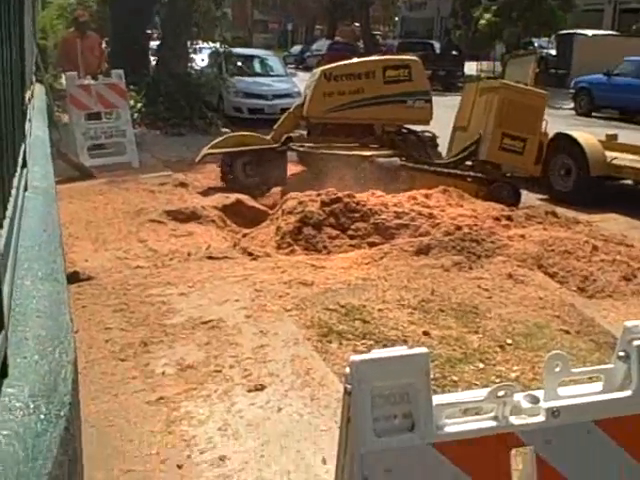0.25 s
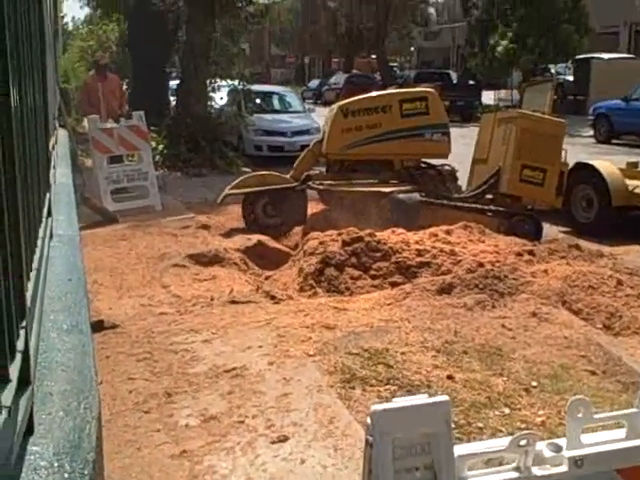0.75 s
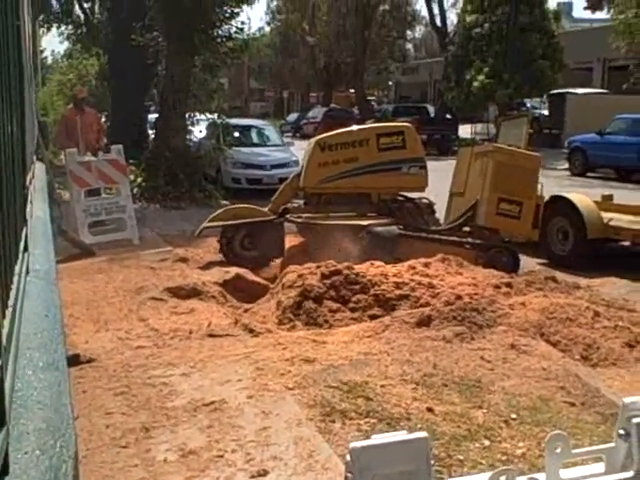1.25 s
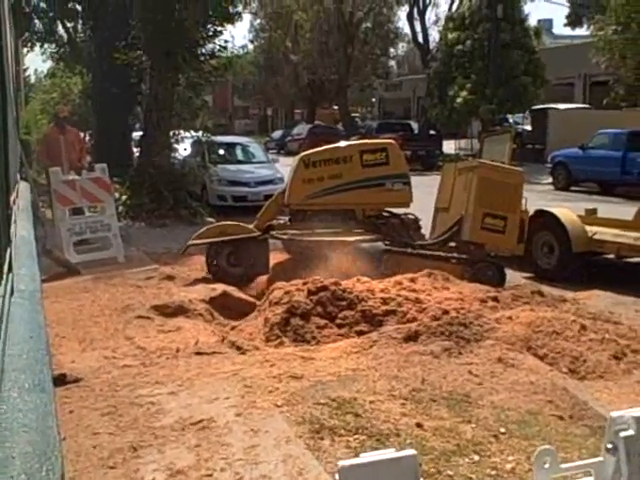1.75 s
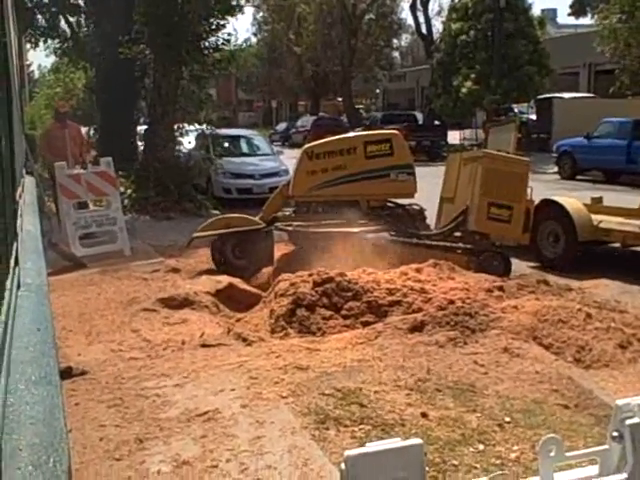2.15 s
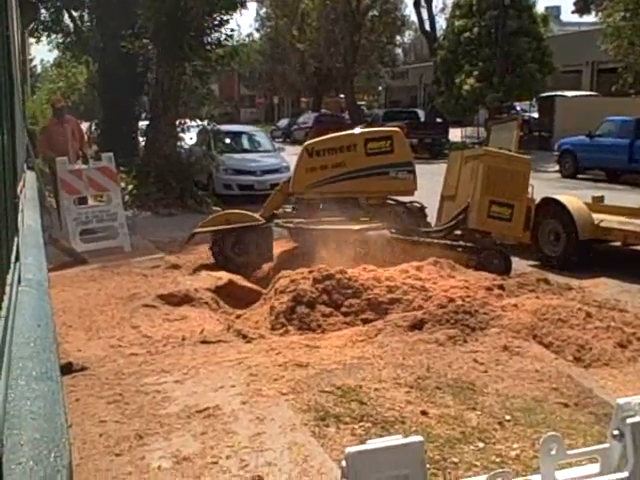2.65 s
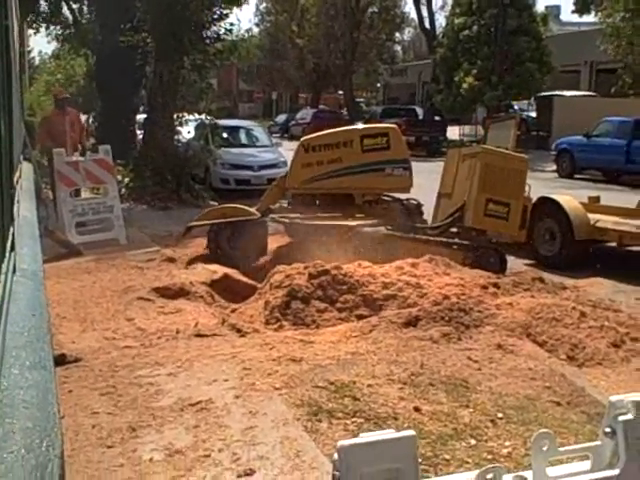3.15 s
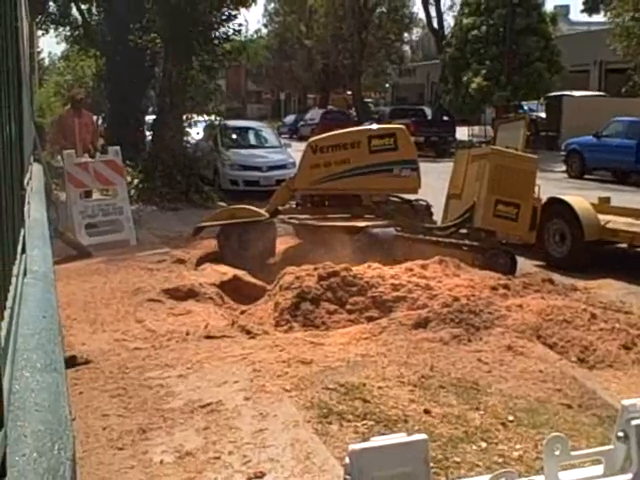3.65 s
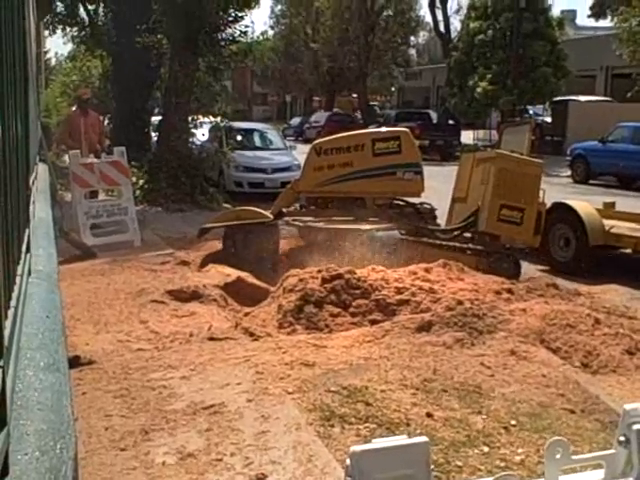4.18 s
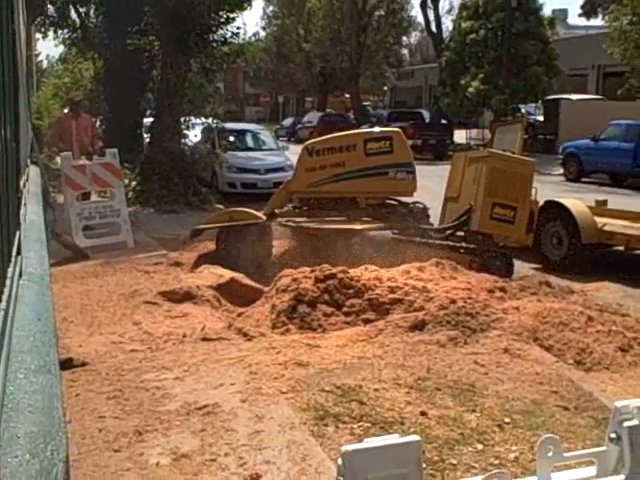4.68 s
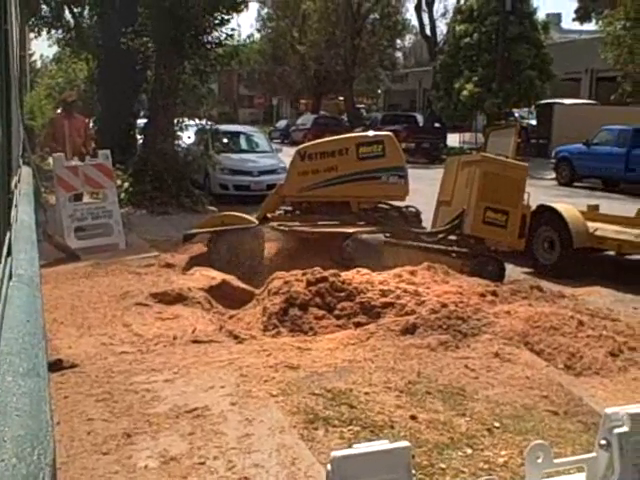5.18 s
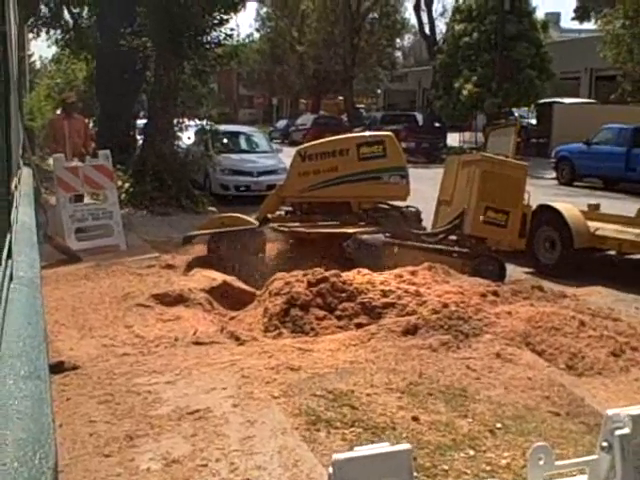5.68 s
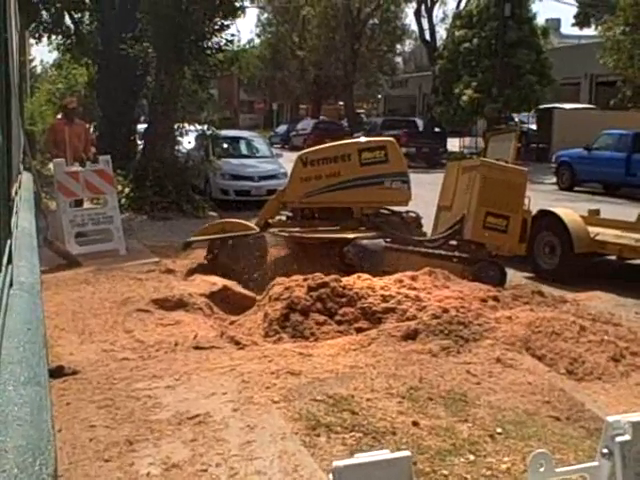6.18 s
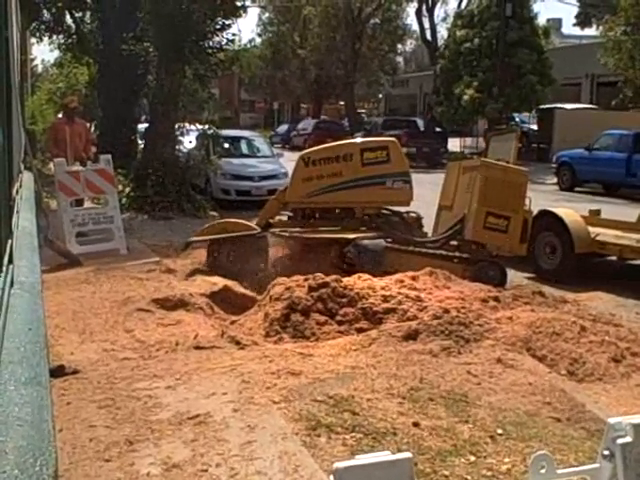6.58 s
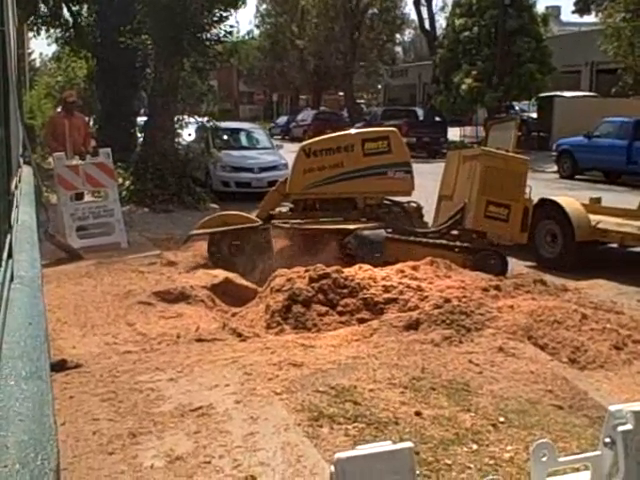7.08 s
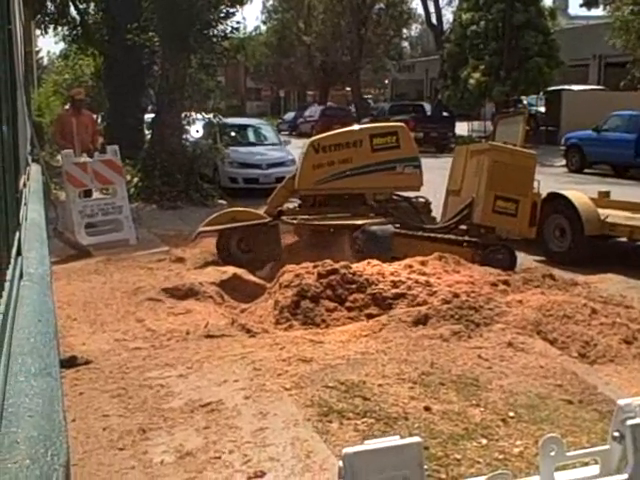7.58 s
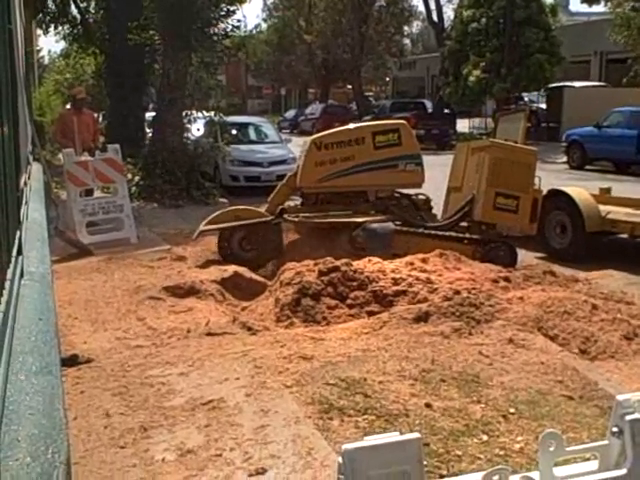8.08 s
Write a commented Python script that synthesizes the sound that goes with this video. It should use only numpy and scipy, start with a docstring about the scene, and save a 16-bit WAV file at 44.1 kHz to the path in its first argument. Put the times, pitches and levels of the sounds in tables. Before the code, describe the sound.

Outdoor machine noise fills everything: deep steady exhaust hum, rumbling and mechanical clatter, and coarse grinding with a fast flutter. Pitch creeps up slightly at first. Around the middle the load drops, the engine races and its drone almost vanishes briefly, then returns with a heavier crunch, brighter chip spray and a few sharp metal pings. A handheld microphone a little way off, mostly direct sound, thin flickering hiss.

```python
"""The exhaust of a four-cylinder diesel stump grinder drones on a street verge: harmonics of the firing rate.
Its puffs rumble as pulsed noise, its block clatters as knocking noise, and the wheel's drive hums.
The cutter rasps as noise pulsed by teeth; chips and stones strike a steel guard, and a thin hiss flickers.
Midway the load drops: the engine races and its note fades for half a second, then the wheel bites deeper."""
import sys
import numpy as np
from scipy import signal
from scipy.fft import rfft, irfft, next_fast_len
from scipy.io import wavfile
from scipy.ndimage import map_coordinates

SR = 44100
rng = np.random.default_rng(int(sys.argv[2]) if len(sys.argv) > 2 else 0)


def wrap_up_sound(samples):
    """Save the sound to the file named by the first command line argument, as 16-bit audio."""
    columns = np.atleast_2d(samples).T
    # keep every value between -1 and 1, then stretch to whole-number steps
    tamed = np.clip(columns, -1, 1)
    steps = np.round(tamed * 32767).astype(np.int16)
    wavfile.write(sys.argv[1], SR, steps)


N = 367353
TIME = np.arange(N) / SR  # s
WHEEL_RATIO = .1917  # wheel turns per firing

# ringing modes of the steel guard: (frequency [Hz], relative level [dB], 60 dB decay time [s])
STEEL_MODES = [(3130, -8, .02), (4080, -4, .035), (4780, 0, .03), (4940, -2, .03), (5920, -1, .04)]


def amp(db):
    """Level to amplitude: 20 dB is a factor of ten."""
    return 10 ** (np.asarray(db) / 20)


def unit(x):
    """Normalisation by the root mean square, to rms 1."""
    return x / np.sqrt(np.mean(x ** 2) + 1e-20)


def curves(rows):
    """Linear interpolation in time: each column of a table at every sample."""
    s, *columns = np.transpose(rows)
    return [np.interp(TIME, s, column) for column in columns]


def colour(x, points):
    """Linear filtering: the spectrum is weighted by a gain curve, then the rms is set to 1."""
    hz, db = np.transpose(points)
    size = next_fast_len(N + 4096)
    bins_hz = np.fft.rfftfreq(size, 1 / SR)
    gain = amp(np.interp(np.log(bins_hz + 1), np.log(hz), db))
    return unit(irfft(rfft(x, size) * gain, size)[:N])


def drift(rate):
    """Slow random modulation of rms 1: straight lines join rate random knots a second."""
    knots = rng.standard_normal(4096)
    return unit(np.interp(TIME * rate, np.arange(len(knots)), knots))


def swell(centre, width):
    """Gaussian envelope of peak 1; it falls to 1/e at width seconds from the centre."""
    return np.exp(-((TIME - centre) / width) ** 2)


def swells(rows):
    """Superposition of Gaussian level changes, in dB."""
    return sum(db * swell(centre, width) for centre, width, db in rows)


def bursts(turns, depth, decay):
    """Periodic modulation: each turn starts a swell that decays exponentially over a steady base."""
    return unit(1 + depth * np.exp(-(turns % 1) / decay))


def pulsing(turns, depth):
    """Sinusoidal amplitude modulation: one rounded swell a turn."""
    return unit(1 + depth * np.cos(2 * np.pi * (turns - .15)))


def grains(per_s, spread_db):
    """Shot noise: random impacts, most small and a few large."""
    hit = rng.random(N) < per_s / SR
    size = amp(spread_db * np.minimum(rng.exponential(1, N), 4))
    sign = rng.choice([-1, 1], N)
    return unit(hit * size * sign)


def patchy(x, depth_db, width_hz, span):
    """Time-frequency modulation: patches of width_hz by span seconds swell and fade at random."""
    size, hop = 1024, 256
    hz, t, z = signal.stft(x, SR, nperseg=size, noverlap=size - hop)
    knots = rng.standard_normal((256, 512))
    grid = np.meshgrid(hz / width_hz, t / span, indexing="ij")
    field = map_coordinates(knots, grid, order=1, mode="wrap")
    z = z * amp(depth_db * unit(np.tanh(2 * field + .5)))  # the hollows run deeper than the swells
    return unit(signal.istft(z, SR, nperseg=size, noverlap=size - hop)[1][:N])


def street(x):
    """Comb filtering: delayed reflections add to the direct sound at about unchanged power."""
    # echoes from the pavement, fence and trailer: (delay [s], gain [ratio])
    reflections = [(.0017, .12), (.0129, .13), (.034, .13)]
    echoes = sum(gain * np.pad(x, (round(delay * SR), 0))[:N] for delay, gain in reflections)
    return (x + echoes) / np.sqrt(1 + sum(gain ** 2 for _, gain in reflections))


def gapped(x):
    """Time-frequency gating: narrow bands drop out at random; each band keeps about its mean power."""
    # how often each band is shut: (frequency [Hz], share of the time [0 to 1])
    dropouts = [(200, 0), (255, .05), (295, .4), (355, .5), (410, .2), (460, .05), (560, .15), (640, .33),
                (750, .03), (1000, .05), (1200, .22), (1380, .18), (1520, .45), (1720, .42), (1950, .1),
                (2900, .12), (3450, .38), (4000, .18), (4900, .2), (5500, .33), (6000, .15), (6600, 0)]
    depth_db, span_s, spacing_hz = -18, .036, 75  # depth before power is restored; spacing holds at 800 Hz
    size, hop = 1024, 256
    hz, t, z = signal.stft(x, SR, nperseg=size, noverlap=size - hop)
    band = 2 * np.sqrt(1000 * (hz + 200)) / spacing_hz  # the bands widen with frequency
    grid = np.meshgrid(band, t / span_s, indexing="ij")
    field = map_coordinates(rng.standard_normal((128, 512)), grid, order=3, mode="wrap")
    share = np.interp(hz, *np.transpose(dropouts))[:, None]
    threshold = np.quantile(field, share[:, 0])[:, None]
    shut = (1 + np.tanh(4 * (threshold - field))) / 2
    gain = amp(depth_db * shut)
    gain /= np.sqrt(np.mean(gain ** 2, axis=1, keepdims=True))
    return signal.istft(z * gain, SR, nperseg=size, noverlap=size - hop)[1][:N]


def hood(x):
    """Resonance and interference: narrow spectral peaks and hollows that wander slowly."""
    # colouring by the hood and nearby surfaces: (centre [Hz], half width at 1/e [Hz], gain [dB])
    peaks = [(350, 30, -2), (405, 22, 1), (580, 30, 2.5), (650, 32, -3.5), (780, 60, 2.5), (1030, 50, 2),
             (1170, 60, -2), (1510, 70, -3.5), (1760, 65, -4), (2020, 100, 2), (2200, 55, -2),
             (3500, 130, -1.5), (4080, 70, 2.5), (4280, 80, -3), (4550, 70, 2.5)]
    wander = .012  # rms share of the frequency by which they shift slowly
    size, hop = 2048, 512
    hz, t, z = signal.stft(x, SR, nperseg=size, noverlap=size - hop)
    shifted = hz[:, None] * (1 + wander * np.interp(t, TIME, drift(1.4)))
    gain_db = sum(db * np.exp(-((shifted - centre) / width) ** 2) for centre, width, db in peaks)
    return signal.istft(z * amp(gain_db), SR, nperseg=size, noverlap=size - hop)[1][:N]


def hiss():
    """Gated band noise: a thin high hiss flickers on and off."""
    # (time [s], level while it sounds [dB], approximate share of the time [0 to 1])
    hiss_course = [(0, -32, 0.81), (1.9, -29, 0.69), (2.8, -33.5, 0.54), (3.4, -32.5, 0.88),
                   (4.1, -33, 0.64), (4.7, -35, 0.52), (5.2, -35, 0.25), (5.5, -22.5, 0.5), (5.7, -35, .01),
                   (6.9, -24, 0.056), (7.25, -27, 0.5), (7.6, -32, .01), (7.95, -27, .03),
                   (8.2, -26.5, .55)]
    # spectrum of the hiss: (frequency [Hz], relative gain [dB])
    hiss_spectrum = [(1500, -23.5), (3500, -17), (5500, -16), (6200, -3.5), (6500, 12), (7200, 15.5),
                     (7450, -32.5), (8700, -13.5), (9500, -54.5)]
    hiss_db, share = curves(hiss_course)
    chance = (1 + np.tanh(.85 * drift(40))) / 2  # about even between 0 and 1
    on = (1 + np.tanh(20 * (share - chance))) / 2
    return amp(hiss_db) * on * colour(rng.standard_normal(N), hiss_spectrum)


def drive(firings):
    """Periodic excitation: the wheel's drive hums at 27 times its turning rate, with a faint octave."""
    # hum before a 1 dB cut and random wavering: (time [s], peak level [dB])
    hum_course = [(0, -33), (.4, -43), (.8, -31), (1.7, -30.5), (2.6, -46), (3.2, -34.5), (4.3, -33),
                  (4.8, -39.5), (5.45, -28), (6.2, -42), (6.7, -30), (7.45, -32.5), (7.82, -26),
                  (8.33, -38)]
    hum_db, = curves(hum_course)
    angle = 2 * np.pi * 27 * firings * WHEEL_RATIO + .25 * drift(18)
    hum = np.sin(angle) + .3 * np.sin(2 * angle)
    return amp(hum_db - 1 + 3 * drift(20)) * hum


def gas(firings):
    """Pulsed flow noise: each puff of exhaust gas rumbles in the muffler."""
    # rumble of the exhaust gas: (time [s], level [dB])
    gas_course = [(0, -30), (2.1, -29.5), (2.7, -31), (3.8, -32.5), (4.05, -40), (4.55, -37), (4.9, -32),
                  (5.45, -21), (5.85, -36), (6.25, -35), (7.0, -30), (7.35, -32), (8.0, -27.5), (8.33, -31)]
    # spectrum of the rumble: (frequency [Hz], relative gain [dB])
    rumble_spectrum = [(15, 0.5), (30, 3.5), (45, 9), (70, 9.5), (130, 10), (200, 9), (255, 4), (330, 0),
                       (420, -21.5), (700, -70)]
    gas_db, = curves(gas_course)
    puffs = rng.standard_normal(N) * bursts(firings, depth=1.0, decay=0.18)
    return amp(gas_db) * colour(puffs, rumble_spectrum)


def block(firings, knock_db):
    """Structure-borne sound: each firing shakes the block and rattles the loose panels of the hood."""
    # spectrum of the block: (frequency [Hz], relative gain [dB])
    block_spectrum = [(200, -9.5), (345, -6), (455, -0.5), (540, -5), (630, -4.5), (740, -1.5), (980, -7),
                      (1180, -6.5), (1350, -7), (1560, -7), (2100, -9), (4000, -15.5), (8000, -82)]
    # unequal knocking of the four cylinders, in firing order: (level [dB])
    cylinder_levels = [-.4, .2, .4, -.2]
    repeat_share = .13  # share of the knocking's power that is the same in every engine cycle
    loose = unit(rng.standard_normal(N) + 0.32 * grains(900, 2.2))
    pattern = rng.standard_normal(2048)
    places = np.linspace(0, 4, len(pattern), endpoint=False)  # four firings make one engine cycle
    steady = unit(np.interp(firings, places, pattern, period=4))
    knock = np.sqrt(repeat_share) * steady + np.sqrt(1 - repeat_share) * loose
    knock *= pulsing(firings, depth=.21) * amp(cylinder_levels)[firings.astype(int) % 4]
    return amp(knock_db + 0.6 * drift(22)) * colour(knock, block_spectrum)


def ring(modes):
    """Modal decay: damped sines with slightly random pitch, as the spot that is struck varies."""
    t = TIME[:SR // 10]
    out = np.zeros(len(t))
    for hz, db, t60 in modes:
        detuned_hz = hz * (1 + 0.0056 * rng.standard_normal())
        out += amp(db - 60 * t / t60) * np.sin(2 * np.pi * detuned_hz * t)
    return out


def stones():
    """Impulsive excitation: each hard chip or stone gives the guard a sharp tick and a short ring."""
    # hard hits on the guard: (time [s], peak level [dB])
    stone_hits = [(5.4674, -9), (5.4744, -9), (5.4864, -10), (5.6935, -7), (5.7389, -4), (5.7504, -5),
                  (6.6094, -7), (6.6962, -7), (7.1796, -8), (8.0621, -7)]
    out, t = np.zeros(N + SR), TIME[:SR // 10]
    for s, db in stone_hits:
        tick = 4 * rng.standard_normal(len(t)) * np.exp(-t / 0.00019)
        hit = unit(ring(STEEL_MODES)) + tick
        out[round(s * SR):][:len(t)] += amp(db) * hit / abs(hit).max()
    return out[:N]


def chips(firings, spray_db):
    """Random impact excitation: each wheel turn flings a large or small clump of chips at the guard."""
    # spectrum of the guard: (frequency [Hz], relative gain [dB])
    guard_spectrum = [(2500, -35.5), (3600, -7.5), (4080, -2), (4350, -2), (4700, -.5), (5050, 2.5),
                      (5500, -4.5), (5950, .5), (6150, -11.5), (6450, -19), (7300, -22), (7750, -24.5),
                      (8700, -44), (10000, -87.5)]
    # larger handfuls of chips: (centre [s], half width at 1/e [s], extra level [dB])
    larger_throws = [(.525, .018, 3), (.965, .018, 2), (1.685, .015, 2.5), (1.85, .025, 2.5),
                     (2.135, .025, 2.5), (2.34, .02, 2), (2.625, .02, 3), (2.795, .018, 4), (3.69, .02, 3),
                     (4.14, .025, 1.5), (5.72, .03, 2), (8.07, .035, 2)]
    wheel = firings * WHEEL_RATIO
    spray = patchy(grains(7000, 2.2), depth_db=3.5, width_hz=170, span=.02)
    rattle = colour(spray * pulsing(firings, depth=0.028), guard_spectrum)
    ringing = np.zeros(N)
    for mode in STEEL_MODES:
        ringing += signal.oaconvolve(grains(300, 2.5), ring([mode]))[:N]
    ringing = colour(unit(ringing), guard_spectrum)
    unevenness_db = np.interp(spray_db, [-26, -21], [2.0, .8])  # a thin spray comes in stronger clumps
    clumps = rng.uniform(.15, 1, 512)[wheel.astype(int)] * np.sin(np.pi * wheel) ** 2
    clumps_db = unevenness_db * unit(np.tanh(4 * (clumps - clumps.mean()))) + drift(130)
    return amp(spray_db - 1.0 + clumps_db + swells(larger_throws)) * (rattle + 0.21 * ringing)


def cutter(firings, rasp_db):
    """Modulated fracture noise: three rows of teeth tear wood fibres each turn, fuller in a deep cut."""
    # spectra of the shallow and the deep cut: (frequency [Hz], relative gain [dB])
    shallow_spectrum = [(500, -12), (1060, -1.5), (1200, -9), (1380, -4), (1600, -7.5), (1950, -1),
                        (2900, 0.5), (3450, -3.5), (3900, 0), (4400, -33), (6200, -12), (7300, -32.5),
                        (8400, -39.5), (9300, -90)]
    deep_spectrum = [(500, -22.5), (1020, 0), (1250, -27.5), (1650, -8), (1950, -3), (2900, 0.5),
                     (3450, 1.5), (4000, -2), (4400, -14.5), (6200, -13.5), (7300, -38), (8400, -32.5),
                     (9300, -90)]
    deep_s, deep_rise_s = 5.2, 0.43  # when, and how quickly, the wheel sinks into a deeper cut
    wheel = firings * WHEEL_RATIO
    tearing = rng.standard_normal(N) + 0.79 * grains(2500, 1.7)
    tearing = patchy(tearing, depth_db=2.5, width_hz=110, span=.035)
    tearing *= bursts(3 * wheel, depth=.7, decay=.35) * bursts(wheel, depth=.4, decay=.3)
    deep = (1 + np.tanh((TIME - deep_s) / deep_rise_s)) / 2
    tearing *= pulsing(firings, depth=.21 - .13 * deep)  # firings jolt the frame, less in a deep cut
    rasp = (1 - deep) * colour(tearing, shallow_spectrum) + deep * colour(tearing, deep_spectrum)
    return amp(rasp_db + 0.12 * drift(29)) * rasp


def faded():
    """Smooth switching: 1 while the engine runs free, 0 under load; it rises faster than it returns."""
    fade_s, fall_s, return_s, rise_s = 4.665, .024, 5.115, .038
    unloaded = (1 + np.tanh((TIME - fade_s) / (2 * fall_s))) / 2
    not_returned = (1 - np.tanh((TIME - return_s) / (2 * rise_s))) / 2
    return unloaded * not_returned


def exhaust(firings, firing_hz, load_db):
    """Harmonic synthesis: periodic puffs give the firing note, its overtones and weaker lines."""
    # firing note before the fade: (time [s], rms level [dB])
    note_course = [(0, -15.5), (0.33, -16.5), (2.3, -12.5), (2.7, -15), (3.7, -13), (4.55, -13.5),
                   (5.25, -17.5), (5.48, -14), (6.25, -20), (7.1, -17), (7.5, -19), (8.05, -14),
                   (8.33, -12)]
    # its octave, which grows as the puffs get sharper: (time [s], rms level [dB])
    octave_course = [(0, -20.3), (1.6, -21.2), (2.3, -22.2), (2.7, -27.5), (3.6, -23.5), (4.5, -23.5),
                     (4.8, -30), (5.02, -30.5), (5.2, -23.5), (5.48, -19.3), (5.9, -25), (6.25, -24),
                     (7.5, -26.3), (8.33, -20.5)]
    # weaker lines at the usual load and octave; the quarters come from unequal cylinders,
    # 1.87 from a belt-driven part: (multiple of the firing rate [ratio], rms level [dB])
    weaker_lines = [(.5, -47), (.75, -35.5), (1.25, -41), (1.5, -39), (1.75, -37), (1.87, -43.5),
                    (2.25, -39), (2.5, -40), (2.75, -46), (3.5, -49), (4.5, -45), (5, -43.5), (5.5, -51),
                    (6.25, -49), (6.5, -46), (8, -44), (9, -42), (9.25, -45), (10, -47)]
    usual_octave_db, usual_load_db = -23.5, -26
    (strength_db,), (octave_db,) = curves(note_course), curves(octave_course)
    free = faded()
    note_db = strength_db - 16.5 * free
    sharpness_db = octave_db - usual_octave_db  # sharper puffs feed the higher lines
    third_db = -43 + 2.3 * sharpness_db
    angle = 2 * np.pi * (firings + .002 * drift(60))
    lag = np.pi / 3  # phase lag of the muffler [rad]
    # the octave turns against the note as the speed changes [rad]
    skew = .22 * np.maximum(firing_hz - 90.2, -5)
    out = amp(note_db + 0.6 * drift(60)) * np.sin(angle - lag)
    octave_waver_db = (.5 + 1.5 * free) * drift(16)  # unsteady while racing
    out += amp(octave_db + octave_waver_db) * np.sin(2 * angle - lag + skew)
    out += amp(third_db + drift(8)) * np.sin(3 * angle - lag + 2 * skew)
    lines_db = 0.1 * sharpness_db + 0.3 * (load_db - usual_load_db) - free
    for multiple, db in weaker_lines:
        phase = (.12 + .08 * multiple) * drift(16) + 2 * np.pi * rng.random()
        out += amp(db + lines_db + 2 * drift(9)) * np.sin(multiple * angle + phase)
    return np.sqrt(2) * out  # a sine of rms 1 peaks at the root of 2


def scene():
    """Common drive and superposition: engine and wheel turn together; load sets knocking and rasp."""
    # engine speed apart from the race: (time [s], firing rate [Hz])
    speed_course = [(0, 83.4), (0.55, 83.7), (0.8, 85), (1.15, 85.3), (2.2, 88.7), (2.75, 91.6),
                    (3.55, 90.1), (4.45, 90), (5.55, 89.5), (6.3, 92.4), (7.45, 91.4), (8.33, 89.5)]
    # how hard the wheel is pressed into the stump: (time [s], level [dB])
    load_course = [(0, -26.5), (0.35, -28), (1.6, -26.5), (3.4, -28.5), (4.66, -29), (4.79, -30.5),
                   (4.92, -27.5), (5.2, -26), (5.5, -23.5), (5.85, -24.5), (6.13, -24.5), (6.55, -21.5),
                   (7.0, -23.5), (8.33, -23.5)]
    # spray of chips, before a 1 dB cut and its clumps: (time [s], level [dB])
    spray_course = [(0, -28), (0.65, -31), (1.2, -27.5), (1.65, -25.5), (2.8, -26.5), (3.15, -25.5),
                    (3.3, -33), (3.6, -31), (4.0, -26.5), (4.25, -27), (4.45, -33.5), (4.6, -29.5),
                    (4.76, -36), (4.9, -26.5), (5.25, -27.5), (5.6, -22), (5.87, -20.5), (7.0, -21),
                    (7.6, -23.5), (8.1, -22.5), (8.33, -21)]
    # spells of harder knocking: (centre [s], half width at 1/e [s], extra level [dB])
    hard_knocks = [(.72, 0.32, 1), (1.25, 0.11, 2.5), (1.7, 0.14, 2.5), (5.49, 0.017, 5.5),
                   (6.58, 0.064, 0), (7.19, 0.17, 1), (7.82, 0.045, 3)]
    # the teeth bite into harder wood: (centre [s], half width at 1/e [s], extra level [dB])
    hard_bites = [(2.87, 0.061, 2), (5.05, 0.14, 4), (5.41, 0.058, 4), (5.465, 0.021, 6.5),
                  (5.65, 0.041, 0.5), (6.3, 0.048, 4.5), (6.62, 0.12, 2)]
    (loaded_hz,), (load_db,), (spray_db,) = curves(speed_course), curves(load_course), curves(spray_course)
    firing_hz = loaded_hz + 6.8 * swell(4.83, .18)  # the engine races once
    firings = np.cumsum(firing_hz) / SR
    knock_db = load_db + 1.5 + swells(hard_knocks)
    rasp_db = load_db + 0.76 + swells(hard_bites)
    grinding = street(cutter(firings, rasp_db) + chips(firings, spray_db))
    din = hood(gapped(gas(firings) + block(firings, knock_db) + grinding))
    engine_note = exhaust(firings, firing_hz, load_db)
    return (engine_note + drive(firings) + din + hiss() + stones())[None]


def record(dry):
    """Overload and band limiting: the recorder clips the loudest peaks, then a low-pass filter acts."""
    ceiling, edge_hz = .72, 15900
    clipped = np.clip(dry, -ceiling, ceiling)
    low_pass = signal.firwin(511, edge_hz, window=("kaiser", 9), fs=SR)
    return signal.oaconvolve(clipped, low_pass[None], "same")


dry = scene()
out = record(dry)
wrap_up_sound(out)
```